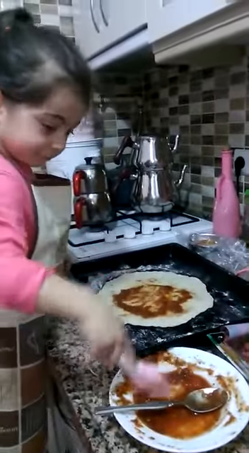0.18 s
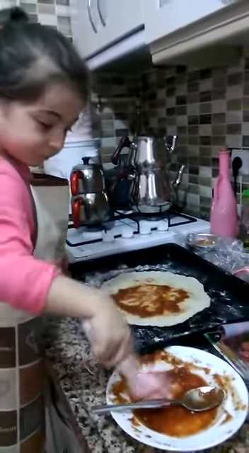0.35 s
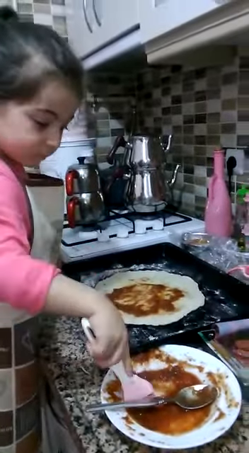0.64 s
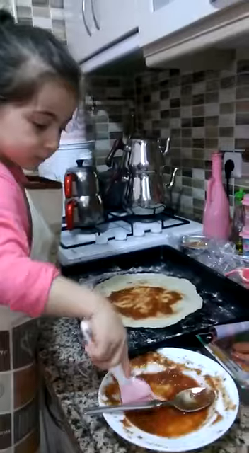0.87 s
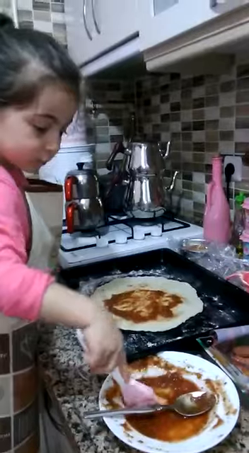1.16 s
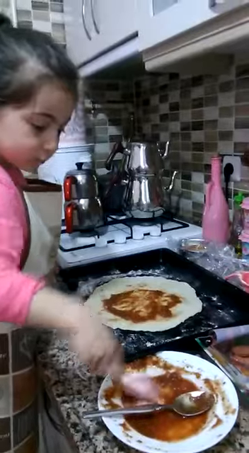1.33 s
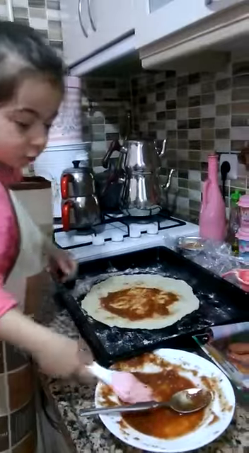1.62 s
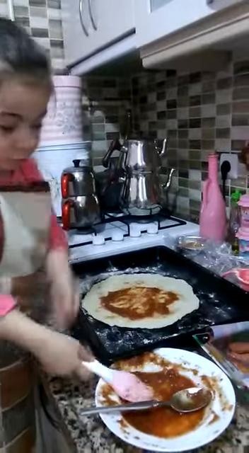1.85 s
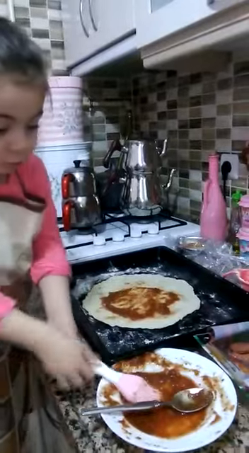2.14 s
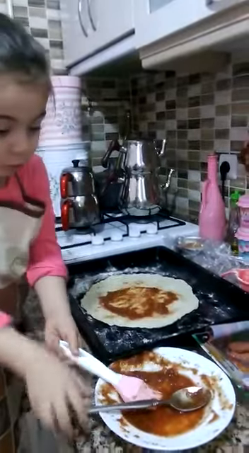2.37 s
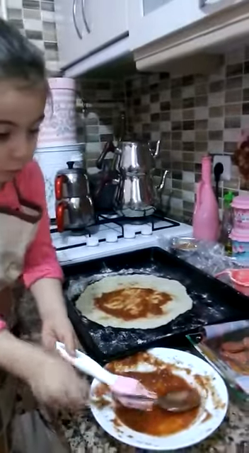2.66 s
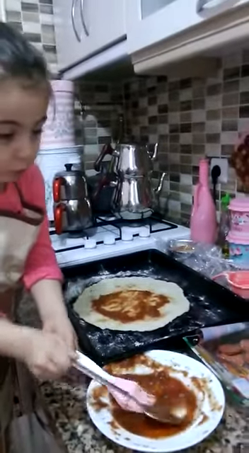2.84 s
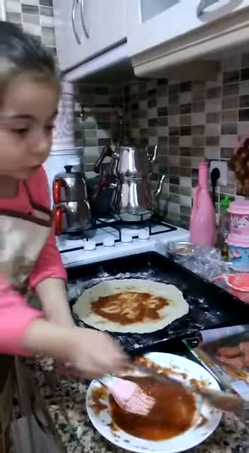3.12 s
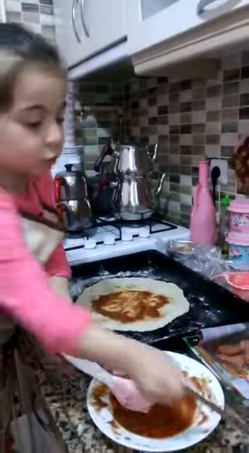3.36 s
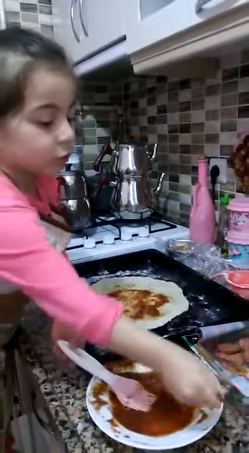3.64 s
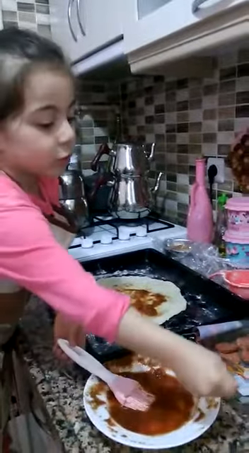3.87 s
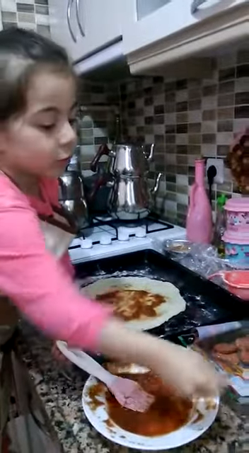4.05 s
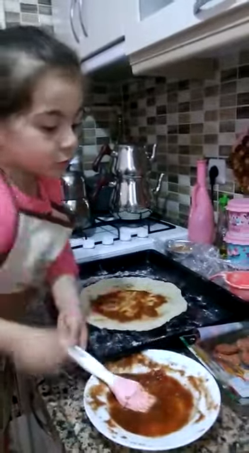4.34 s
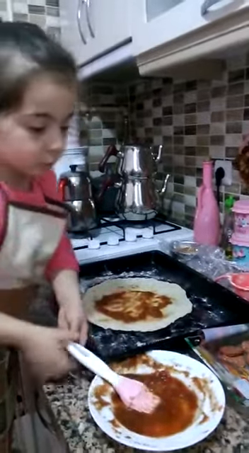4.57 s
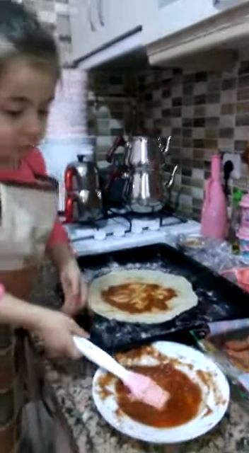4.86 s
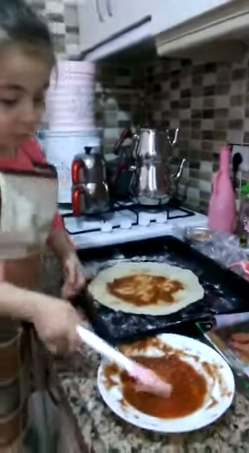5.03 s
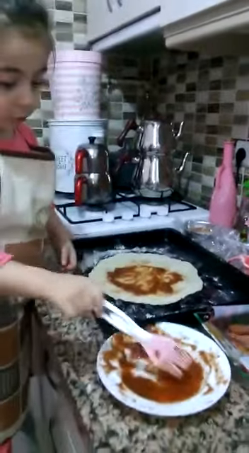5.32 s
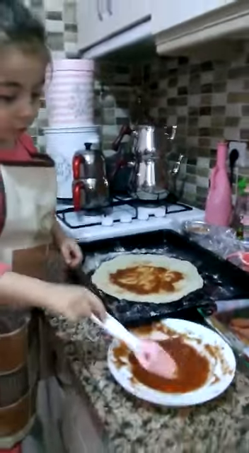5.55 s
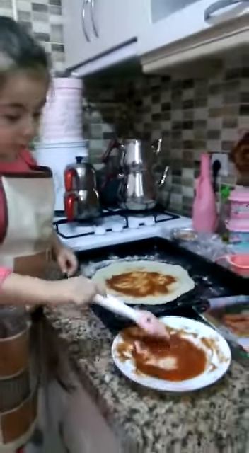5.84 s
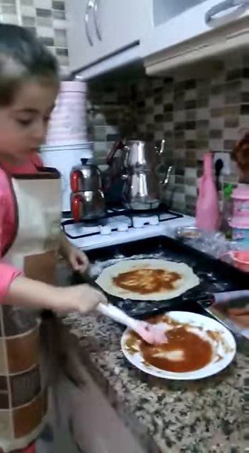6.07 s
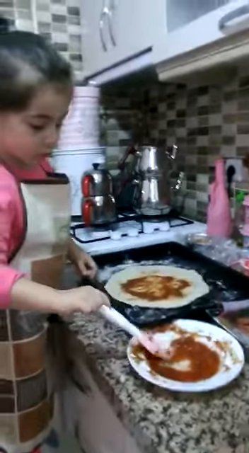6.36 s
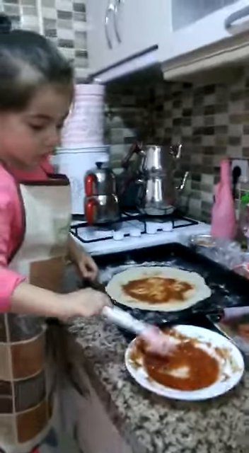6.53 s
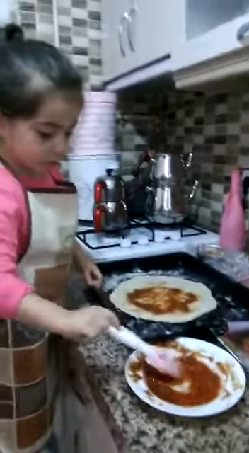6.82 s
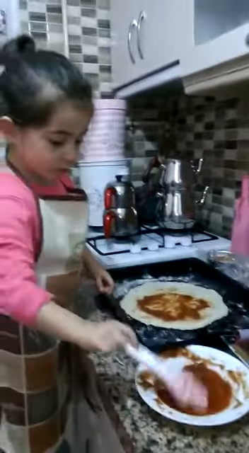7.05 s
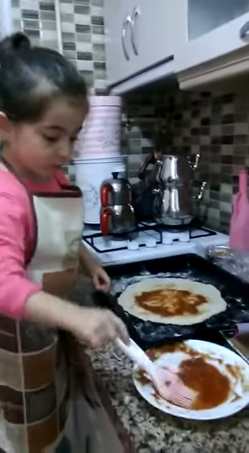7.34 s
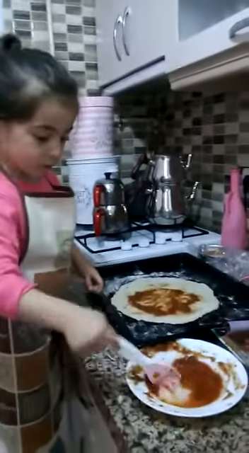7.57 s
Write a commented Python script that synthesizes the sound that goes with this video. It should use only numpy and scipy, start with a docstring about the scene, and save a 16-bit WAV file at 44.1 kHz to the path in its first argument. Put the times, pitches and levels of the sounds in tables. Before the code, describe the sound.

A spoon clinks lightly on a ceramic plate, knocks on a stone counter, then falls with a loud clatter over a low kitchen hum.

```python
"""In a small tiled kitchen an appliance hums and soft bumps excite a resonance of the floor. A wet basting
brush dabs a ceramic plate of sauce; a steel spoon rings the plate's modes by tapping and by friction.
The spoon is knocked on the stone counter, slips off the edge and rebounds on a hollow panel below,
loud enough to overload the microphone. The room reverberates after each blow."""
import sys
import numpy as np
from scipy import signal
from scipy.fft import rfft, irfft, next_fast_len
from scipy.io import wavfile
from scipy.ndimage import map_coordinates

SR = 44100
rng = np.random.default_rng(int(sys.argv[2]) if len(sys.argv) > 2 else 0)


def waveform_to_disk(signal):
    """Save audio, clipped to [-1, 1], as 16-bit WAV at the path in sys.argv[1]."""
    frames = np.transpose(np.atleast_2d(signal))
    scaled = np.clip(frames, -1, 1) * 32767
    samples = np.round(scaled).astype(np.int16)
    wavfile.write(sys.argv[1], SR, samples)


N = 339323
RING_TIME = np.arange(int(.7 * SR)) / SR  # time axis of one blow [s]

# modes of the plate with the spoon on it: (frequency [Hz], level [dB], decay time T60 [s])
PLATE_MODES = [(916, -7, 0.029), (1210, -1.5, 0.042), (1363, -4, 0.072), (1576, -10.5, 0.071),
               (1805, 12, 0.0134), (2196, -15.5, 0.057), (2470, 0.5, 0.034), (2592, 1.5, 0.031),
               (2880, -11, 0.096), (2854, -14, 0.069), (3730, 7, 0.015), (3787, 1, 0.015),
               (4897, 10, 0.042), (6160, 8.5, 0.019), (7250, -12, .06), (8900, -19, .08),
               (9200, -11.5, 0.1)]
# spectrum of a hard contact: (frequency [Hz], spectral level [dB])
CONTACT_SPECTRUM = [(150, -32.5), (300, -7), (550, 1.5), (750, -2), (1000, -1.5), (1600, -1), (2500, -2),
                    (3300, -5.5), (5000, -3), (7000, -10.5), (8200, -22), (11000, -44), (14200, -27)]


def amp(db):
    """Amplitude ratio of a level in decibels."""
    return 10 ** (np.asarray(db) / 20)


def unit(x):
    """Normalisation to an rms of 1."""
    return x / np.sqrt(np.mean(x ** 2) + 1e-20)


def along(points, hz):
    """Interpolation of (frequency [Hz], value) points on a logarithmic frequency axis."""
    frequencies, values = np.transpose(points)
    return np.interp(np.log(hz + 1), np.log(frequencies + 1), values)


def rise(seconds):
    """Exponential onset with the given time constant."""
    return 1 - np.exp(-RING_TIME / seconds)


def fade(t60):
    """Exponential damping: 60 dB are lost in t60 seconds."""
    return np.exp(-np.log(1000) * RING_TIME / t60)


def wobble(per_s):
    """Smooth random modulation: a spline through per_s random values a second."""
    knots = rng.standard_normal(int(N * per_s / SR) + 4)
    return map_coordinates(knots, [np.arange(N) * per_s / SR])


def filtered(x, response):
    """Linear filtering: the spectrum is multiplied by a frequency response."""
    size = next_fast_len(len(x) + 8192)
    return irfft(rfft(x, size) * response(np.fft.rfftfreq(size, 1 / SR)), size)[:len(x)]


def treble_cut(x, edge_hz, order):
    """Low-pass filtering: above the edge the level falls 6 dB per octave for each order."""
    return filtered(x, lambda hz: 1 / np.sqrt(1 + (hz / edge_hz) ** (2 * order)))


def noise(spectrum, size=len(RING_TIME), tilt=0):
    """Spectrally shaped noise of rms 1, tilted in dB per octave."""
    white = rng.standard_normal(size)
    return unit(filtered(white, lambda hz: amp(along(spectrum, hz) + tilt * np.log2(hz + 1))))


def ring(modes, scatter_db, tilt=0):
    """Free vibration is a sum of damped modes; each blow shares the energy among them anew."""
    hz, db, t60 = np.transpose(modes)
    gain = amp(db + tilt * np.log2(hz) + scatter_db * rng.standard_normal(len(hz)))
    phase = 2 * np.pi * (hz[:, None] * RING_TIME + rng.random((len(hz), 1)))
    return np.sqrt(2) * (gain / np.linalg.norm(gain)) @ (np.sin(phase) * fade(t60[:, None]))


def add(track, s, sound):
    """Superposition: a sound joins the track at s seconds."""
    part = track[round(s * SR):][:len(sound)]
    part += sound[:len(part)]


def in_kitchen(x, wet_db):
    """Reverberation: a diffuse tail follows the direct sound, its treble absorbed soonest."""
    # decay of the tiled room: (frequency [Hz], reverberation time T60 [s])
    room_decay = [(200, .48), (550, .42), (1400, .39), (3700, .34), (7000, .31), (12000, .26)]
    hz, t, bands = signal.stft(rng.standard_normal(len(x)), SR, nperseg=256)
    decay = np.exp(-np.log(1000) * t / along(room_decay, hz)[:, None])
    _, tail = signal.istft(bands * decay, SR, nperseg=256)
    return x + amp(wet_db) * signal.fftconvolve(x, tail / np.linalg.norm(tail))[:len(x)]


def appliance():
    """Forced vibration: a motor's spectral lines waver slightly over a broadband rush of air."""
    # motor lines: (frequency [Hz], rms level [dB])
    motor_lines = [(95, -56), (113, -51), (188.4, -55.5), (219, -59), (226.1, -49.5), (251, -56.5),
                   (280, -62), (344, -67.5), (381, -67), (500.6, -69)]
    # rush of the appliance and room hiss: (frequency [Hz], spectral level [dB])
    air_spectrum = [(20, -29), (45, -26), (70, -9), (100, 1), (135, -8), (175, -5), (225, 3), (310, -10),
                    (480, -14.5), (620, -29), (850, -41.5), (1500, -44), (5000, -47), (14000, -50.5)]
    t = np.arange(N) / SR
    hum = np.zeros(N)
    for hz, db in motor_lines:
        peak = np.sqrt(2) * amp(db + .94 * wobble(per_s=10))
        hum += peak * np.sin(2 * np.pi * hz * t + .6 * wobble(per_s=2.3))
    return hum + amp(-49.8) * noise(air_spectrum, N)


def small_contacts():
    """Damped narrow-band transients: short wet ticks and rubs on the plate, one more brief tick near 6.5 s, and
    one soft low knock."""
    # ticks and rubs, a brief tick near 6.5 s and the low knock: (time [s], level [dB], centre frequency [Hz])
    contacts = [(.632, -66, 5500), (1.216, -66, 3900), (1.217, -60, 6350), (1.490, -68, 6450),
                (3.271, -52.5, 2030), (3.527, -52, 2950), (3.65, -63.5, 3600), (3.896, -59.5, 3400),
                (6.473, -45.5, 5910), (6.974, -57.5, 4336), (6.976, -52, 626)]
    half_width_octaves = .14
    out = np.zeros(N)
    for s, db, hz in contacts:
        grains = rng.standard_normal(len(RING_TIME)) ** 3  # cubing makes the noise spiky
        band = filtered(grains, lambda f: 1 / (1 + (np.log2((f + 1) / hz) / half_width_octaves) ** 4))
        burst = unit(band) * rise(.00067) * fade(.07)
        add(out, s, amp(db) * in_kitchen(burst, wet_db=2.5))
    return out


def floor_bumps():
    """Resonance: each soft push swells into one low mode of the floor."""
    # pushes on the floor: (time [s], level [dB])
    pushes = [(0.644, -27), (1.223, -20.5), (1.487, -19), (1.984, -25)]
    floor_hz, floor_t60_s = 92.3, .2
    out = np.zeros(N)
    for s, db in pushes:
        add(out, s, amp(db) * ring([(floor_hz, 0, floor_t60_s)], scatter_db=0) * rise(.028) ** 2)
    return out


def plate_taps():
    """Impact excitation: a tap cushioned by sauce rings the plate, then settles with a second touch."""
    # spoon or brush handle on the plate: (time [s], level [dB], spectral tilt [dB/octave])
    taps = [(2.401, -34.5, -12), (3.045, -32.5, -6.5), (3.149, -33.5, -3), (3.263, -38.5, 1),
            (3.488, -36, -6.5), (3.721, -49.5, -14), (4.017, -49.5, -8), (6.974, -59.5, -9)]
    out = np.zeros(N)
    for s, db, tilt in taps:
        for delay_s, touch_db in [(0, -3), (rng.uniform(.0017, .01), -8)]:
            tick = amp(-6) * noise(CONTACT_SPECTRUM, tilt=tilt) * fade(.02)
            clink = (ring(PLATE_MODES, scatter_db=5, tilt=tilt) + tick) * rise(.002)
            add(out, s + delay_s, amp(db + touch_db) * in_kitchen(clink, wet_db=2))
    return out


def spoon_drag():
    """Friction noise drives the plate's modes, each by a varying amount as the contact point moves."""
    # strokes of the spoon through the sauce: (time [s], duration [s], level [dB])
    strokes = [(2.44, 0.52, -70.5), (3.146, 0.33, -65.5)]
    tilt_db_per_octave, half_width_hz, uneven_db = -1, 150, 5
    t = np.arange(N) / SR
    swell = np.zeros(N)
    for s, duration, db in strokes:
        progress = np.clip((t - s) / duration, 0, 1)
        swell += amp(db) * np.sqrt(np.abs(np.sin(np.pi * progress)))
    friction = rng.standard_normal(N)
    scrape = np.zeros(N)
    for hz, db, _ in PLATE_MODES:
        mode = filtered(friction, lambda f: 1 / (1 + ((f - hz) / half_width_hz) ** 2))
        scrape += mode * amp(db + tilt_db_per_octave * np.log2(hz) + uneven_db * wobble(per_s=22))
    return swell * unit(scrape)


def counter_knocks():
    """Brief contact gives a broad spectrum: steel clacks on stone, then rings as it slips off the edge."""
    # spoon on stone: (time [s], level [dB], spectral tilt [dB/octave], reverberant-to-direct ratio [dB])
    knocks = [(4.084, -12, 0.37, 5.5), (4.171, -17.5, -1.5, -6.5), (4.367, -34.5, -1, 0),
              (4.380, -20.5, -1, 5.5)]
    # the handle catching on the counter's edge: (time [s], level [dB])
    catches = [(4.37, -46.5), (4.403, -30.5)]
    out = np.zeros(N)
    for s, db, tilt, wet_db in knocks:
        contact = treble_cut(noise(CONTACT_SPECTRUM, tilt=tilt), edge_hz=14500, order=4)
        add(out, s, amp(db) * in_kitchen(contact * rise(.001) * fade(.024), wet_db))
    for s, db in catches:
        add(out, s, amp(db) * in_kitchen(spoon_ring(flutter_db=2.5) * rise(.0045), wet_db=-6.5))
    return out


def spoon_ring(flutter_db):
    """Directional radiation: as the ringing spoon tumbles, each mode flutters in level and phase."""
    # modes of the steel spoon: (frequency [Hz], level [dB], decay time T60 [s])
    spoon_modes = [(2050, -13, .25), (2716, -13, .25), (3776, -8, .3), (4070, -7, .22), (4957, -5, .33),
                   (6712, -6, .25), (7374, -6, .3), (8960, -11, .15), (9060, -14, .13), (9871, 0, .19),
                   (9970, -8, .16), (13270, -18, .17), (13420, -19, .15), (13950, -21, .15)]
    hz, db, t60 = np.transpose(spoon_modes)
    knots = rng.standard_normal((len(hz), 90))
    flutter = signal.resample(knots, len(RING_TIME), axis=1)
    gain = amp(db + 3 * rng.standard_normal(len(hz)))
    phase = 2 * np.pi * (hz[:, None] * RING_TIME + rng.random((len(hz), 1))) + flutter[::-1] / 2
    partials = np.sin(phase) * amp(flutter_db * flutter) * fade(t60[:, None])
    return np.sqrt(2) * (gain / np.linalg.norm(gain)) @ partials


def panel_impact(clack_db, boom_db, ring_db, edge_hz):
    """A collision excites both bodies: the contact clacks, the hollow panel booms and the spoon rings."""
    # contact of steel on the panel: (frequency [Hz], spectral level [dB])
    clack_spectrum = [(290, -27.5), (500, -24), (600, -6), (740, -16), (900, -15), (1480, -13),
                      (1670, -17.5), (2100, -13), (2800, -13), (3400, -16.5), (4000, -15), (6000, -17),
                      (8800, -28.5), (14200, -44.5)]
    # dull thump of the panel: (frequency [Hz], spectral level [dB])
    thump_spectrum = [(20, -33.5), (60, -30), (90, -5), (140, -29), (220, -1), (330, -5.5), (410, -12),
                      (490, -4.5), (620, -1), (750, -14), (1200, -18.5), (3000, -58)]
    # modes of the hollow panel: (frequency [Hz], level [dB], decay time T60 [s])
    panel_modes = [(205, -7, .3), (229, 0, .42), (258, -4, .33), (282, -5, .28), (329, -2, .27),
                   (348, -9, .25), (386, -9, .28), (478, 0, .25), (510, -6, .25), (556, -5, .3),
                   (588, -2, .32), (610, -2, .31), (653, -6, .3), (895, -8, .33), (927, -13, .33),
                   (1005, -11, .3), (1090, -13, .3), (1164, -11, .28)]
    contact = treble_cut(noise(clack_spectrum), edge_hz, order=3)
    chatter = amp(-17) * fade(.15)
    clack = in_kitchen(contact * (fade(.022) + chatter) * rise(.002), wet_db=0)
    thump = amp(-2) * noise(thump_spectrum) * fade(.23)
    boom = in_kitchen((ring(panel_modes, scatter_db=.5) + thump) * rise(.0033), wet_db=-9.5)
    steel = in_kitchen(spoon_ring(flutter_db=1.5) * rise(.00067), wet_db=-6.5)
    return amp(clack_db) * clack + amp(boom_db) * boom + amp(ring_db) * steel


def spoon_clatter():
    """Inelastic rebound: after each landing the spoon rocks from bowl to handle, sooner and softer."""
    # landings of the fallen spoon: (time [s], clack level [dB], boom level [dB], ring level [dB],
    # first flight time [s], clack loss per rebound [dB])
    landings = [(4.508, 4.5, -2, -18.5, .021, 11.5), (4.529, -0.5, -11.5, -9.5, .017, 6),
                (4.652, -10, -15.5, -25.5, .036, 7.5), (4.746, -4.5, -12, -35.5, .012, 6.5),
                (4.850, 4, -10, -28.5, .027, 20.5), (4.909, -7.5, -18, -32.5, .031, 7),
                (4.971, -5, -11, -41.5, .015, 2), (5.027, 1, -11.5, -37, .017, 3.5),
                (5.094, -16.5, -17, -56, .023, 13)]
    rebounds, flight_ratio = 2, .85
    boom_loss_db, ring_loss_db = 4, 11  # per rebound
    edges_hz = np.geomspace(22000, 11000, len(landings))  # slower contacts carry less treble
    out = np.zeros(N)
    for (s, clack_db, boom_db, ring_db, flight_s, clack_loss_db), edge_hz in zip(landings, edges_hz):
        for k in range(1 + rebounds):
            impact = panel_impact(clack_db - k * clack_loss_db, boom_db - k * boom_loss_db,
                                  ring_db - k * ring_loss_db, edge_hz)
            add(out, s, impact)
            s += flight_s * flight_ratio ** k
    return filtered(out, lambda hz: (1j * hz / (55 + 1j * hz)) ** 2)  # a small panel radiates no deep bass


def scene():
    """The pressures of all sources add at one microphone."""
    utensils = plate_taps() + spoon_drag() + counter_knocks() + spoon_clatter() + small_contacts()
    return (utensils + floor_bumps() + appliance())[None]


def record(dry):
    """Saturation and band limiting: the loudest blows clip; treble above about 14.5 kHz is cut off."""
    # band limit: (frequency [Hz], gain [dB])
    band_limit = [(20, 0), (14250, 0), (14600, -20), (15600, -24)]
    ceiling, top_hz = .96, 15590
    clipped = dry[0] / (1 + np.abs(dry[0] / ceiling) ** 8) ** (1 / 8)
    return filtered(clipped, lambda hz: amp(along(band_limit, hz)) * (hz < top_hz))[None]


dry = scene()
out = record(dry)
waveform_to_disk(out)
```